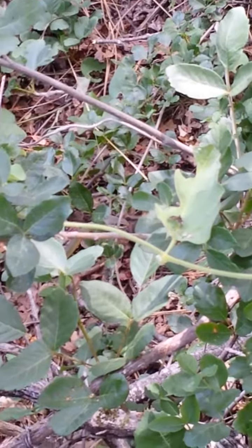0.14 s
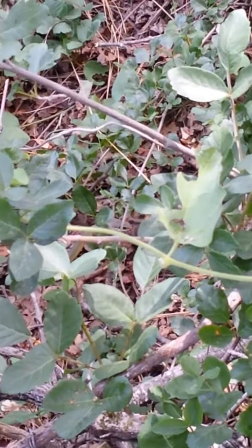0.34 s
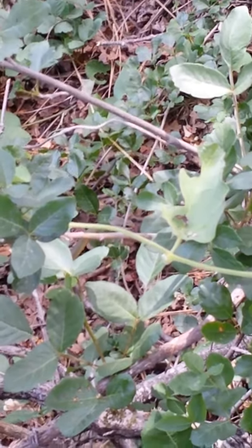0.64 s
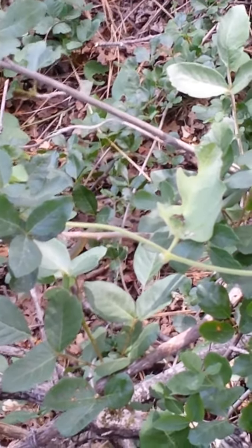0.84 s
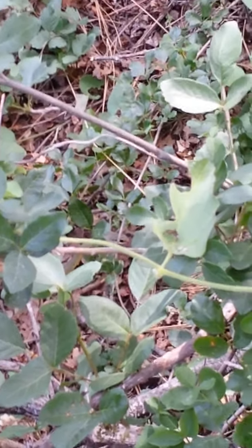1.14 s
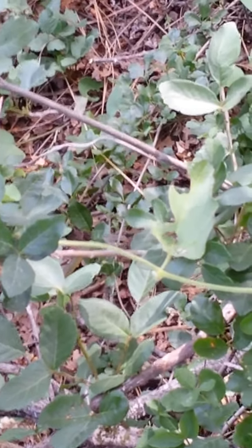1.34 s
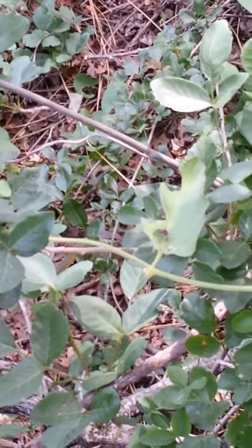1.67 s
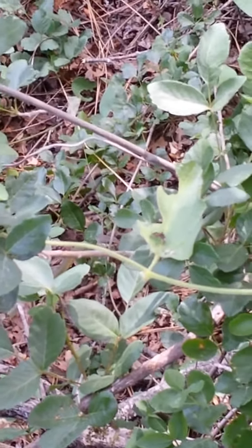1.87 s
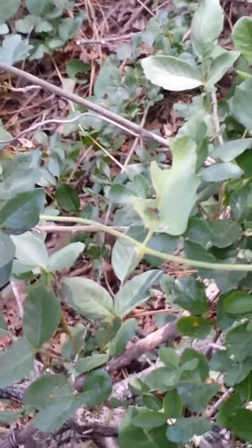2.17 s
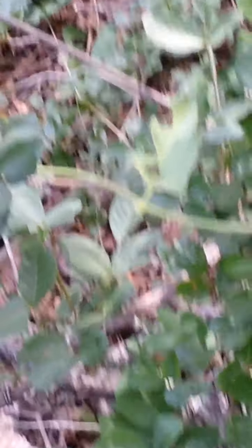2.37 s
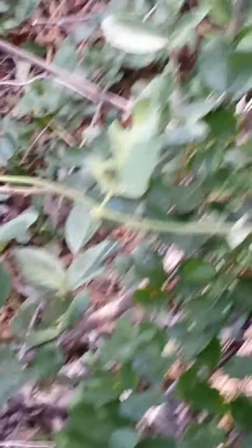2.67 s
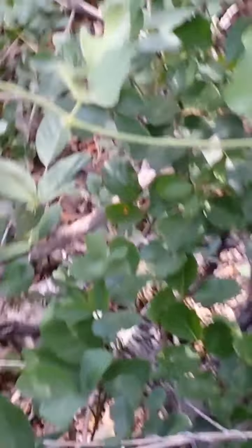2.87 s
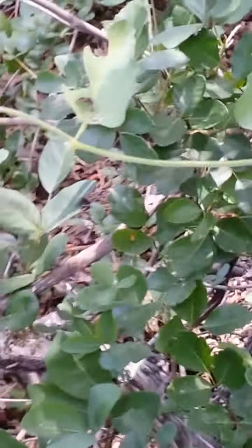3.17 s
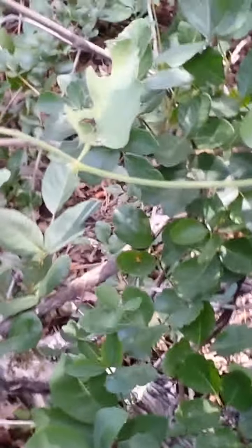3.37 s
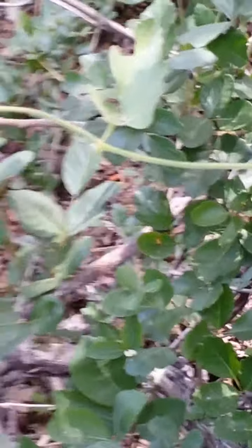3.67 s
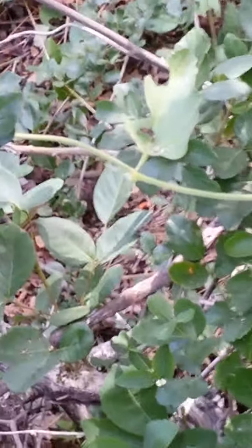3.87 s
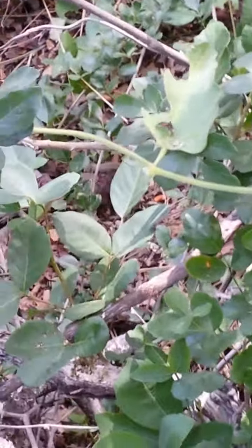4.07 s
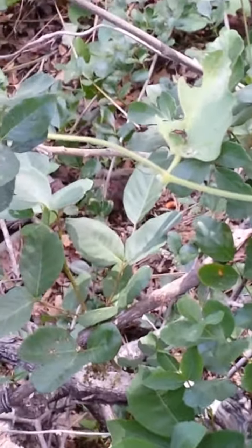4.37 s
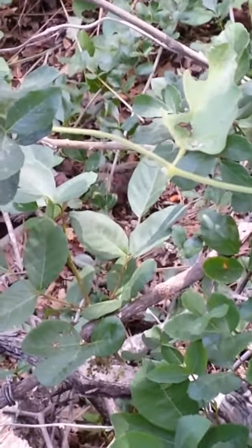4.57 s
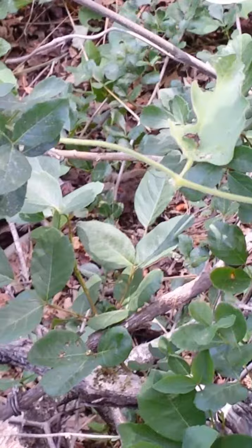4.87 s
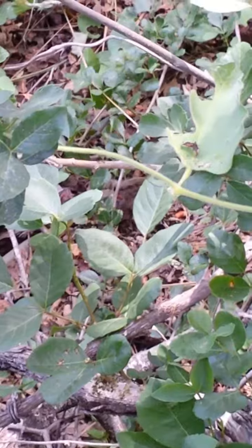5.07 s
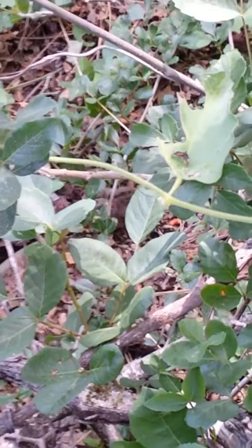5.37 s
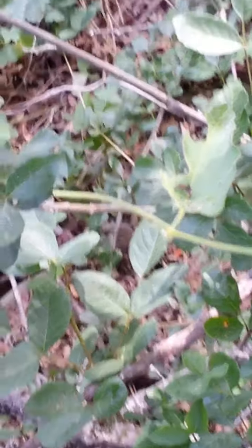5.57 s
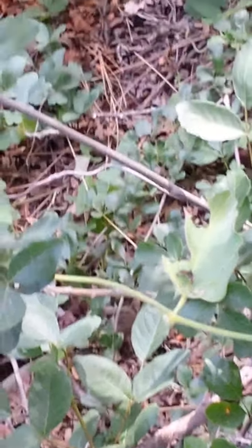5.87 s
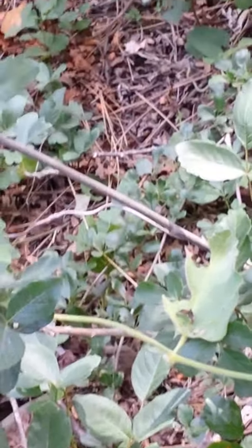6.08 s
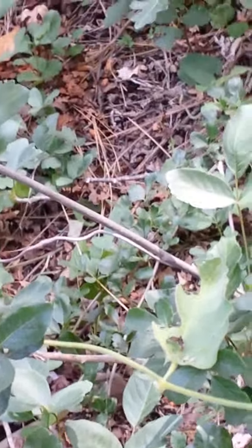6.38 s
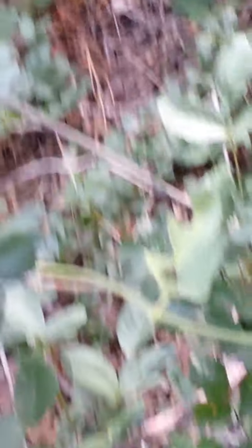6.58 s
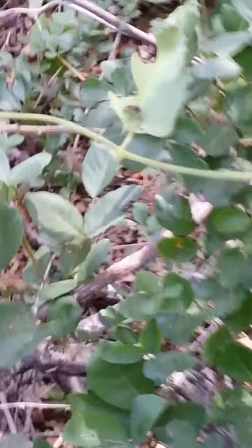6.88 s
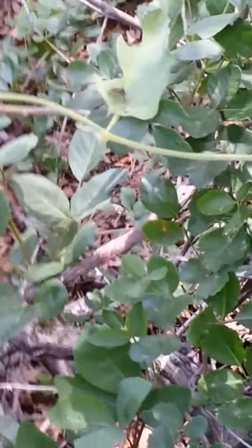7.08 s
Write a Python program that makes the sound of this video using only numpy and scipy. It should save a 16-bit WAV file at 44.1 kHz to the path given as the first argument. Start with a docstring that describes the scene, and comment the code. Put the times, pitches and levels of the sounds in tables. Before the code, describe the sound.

Small rodent squealing about four times a second in low brush, leaves crackling as it kicks, close handling bumps and soft outdoor hiss.

```python
"""Mouse squealing in low brush

A distressed mouse squeals in arching squeaks, stacks of gliding harmonics that break into rasp and hiss.
A few soft whimpers are bending pure tones, and its kicks crackle in dry leaves as bursts of tiny noise grains.
A phone is held close over it: the hand thumps (short swings), clicks (pressure steps) and rubs (noise)
on the case, and its two sound ports hear very different shares. Soft outdoor noise lies underneath.
"""
import sys
import numpy as np
from scipy import signal
from scipy.fft import rfft, irfft, next_fast_len
from scipy.io import wavfile
from scipy.ndimage import map_coordinates

SR = 44100
rng = np.random.default_rng(int(sys.argv[2]) if len(sys.argv) > 2 else 0)


def to_wav(s):
    """Save 16-bit WAV."""
    ch = np.atleast_2d(s).T  # columns
    pcm = np.round(np.clip(ch, -1, 1) * 32767)  # PCM
    wavfile.write(sys.argv[1], SR, pcm.astype(np.int16))


N = 318181
TIME = np.arange(N) / SR
FREQS = np.fft.rfftfreq(next_fast_len(N, True), 1 / SR)
TOP_HZ = 14750  # upper limit of the sound's band


# squeaks: (start [s], length [s], climb time [s], crest pitch [Hz], climb [Hz], fall [Hz per s],
#   rounding of the crest [s], voice breaks after [s], roughness [0-1], level [dB],
#   swell from start to end [dB], second harmonic [dB], third harmonic [dB],
#   mouth resonance at the start [Hz], at the end [Hz], fundamental against the whole cry [dB])
SQUEAK_RUN = [(1.159, 0.025, 0.013, 1507, 101, 5000, .02, .02, .35, -42, 14, 0, 1, 9100, 9100, -15),
              (1.339, 0.097, 0.027, 1822, 375, 7090, 0.0038, 0.063, 0.42, -40.5, 0, 4, 6.5, 8900, 9600, -12.5),
              (1.55, 0.12, .022, 1689, 305, 11070, 0.066, 0.06, 0.42, -40.5, 4, -3, 8.5, 9800, 9050, -14.5),
              (1.811, 0.14, 0.015, 1560, 152, 7240, 0.013, 0.05, 0.38, -39.5, -11, -6, 0.5, 9100, 9100, -16.5),
              (2.066, 0.15, 0.03, 1544, 335, 7900, .067, .1, 0.35, -41.5, -3.5, -7, 5, 9040, 9400, -15),
              (2.366, .075, .025, 1539, 404, 7240, 0.011, 0.04, .35, -42.5, 1.5, -4, 7, 9200, 10000, -17),
              (2.597, 0.068, 0.036, 1602, 296, 12000, 0.0057, .041, 0.48, -44.5, 1, -1, 5.5, 8600, 9400, -14),
              (2.812, .12, 0.049, 1964, 322, 5800, 0.0035, 0.092, 0.4, -39.5, 1, -1, 2, 7800, 10300, -17),
              (3.105, 0.16, 0.025, 1655, 343.6, 7650, .011, 0.1, 0.43, -43, -9, -6, 3, 10900, 8000, -15),
              (3.513, 0.053, 0.024, 1753, 213, 19300, .013, 0.053, 0.2, -37.5, 4, -4, 0.5, 10200, 9900, -21),
              (3.704, 0.067, 0.023, 1924, 389, 14000, .015, 0.042, 0.6, -45, 3.5, -3, 2, 9500, 10000, -18),
              (3.89, 0.068, 0.031, 1870, 227, 19800, 0.012, 0.058, 0.42, -43, 5, -2, -3, 9400, 9400, -20),
              (4.11, 0.12, .021, 1727, 235, 11630, 0.052, .085, 0.42, -45.5, -0.5, -1, -1, 9100, 9300, -19),
              (4.376, 0.082, 0.024, 1540, 193, 8860, 0.013, .055, 0.44, -46, 6, 3, -9, 9200, 9300, -15),
              (4.628, 0.066, 0.018, 1818, 80, 20800, 0.043, 0.036, 0.23, -38.5, -7, -3, 2.5, 9300, 9100, -21.5),
              (4.837, 0.09, 0.031, 1595, 286, 9700, 0.014, .06, 0.3, -43.5, 0, 1, 1, 9900, 9500, -14),
              (5.121, 0.06, .025, 1372, 61, 18000, .023, .035, 0.43, -45, 12, -1, -1, 8650, 9050, -18),
              (5.373, 0.06, 0.026, 1576, 220, 17400, 0.0046, 0.04, 0.38, -42.5, 1, -1, 4.5, 8900, 9400, -13.5),
              (5.614, 0.077, 0.012, 1642, 185, 13450, 0.0084, 0.05, 0.73, -45, -1, -1, 2.5, 9300, 9100, -15),
              (5.843, 0.074, 0.014, 1497, 80.6, 15000, 0.054, 0.032, 0.55, -42.5, -1, 2.5, 6, 8700, 9100, -16.5),
              (6.157, 0.056, 0.015, 1538, 290, 21480, 0.026, .036, 0.56, -45, 8, 2.5, 11, 8800, 8500, -15.5),
              (6.429, 0.051, 0.0098, 1494, 40, 20800, 0.039, 0.03, .4, -49.5, 3, 3, 1, 8750, 8600, -12.5),
              (6.658, 0.082, 0.017, 1666, 156, 7620, 0.0043, 0.058, 0.54, -42, -1.5, 1, 0, 9800, 10000, -13.5),
              (6.912, 0.088, 0.0069, 1530, 261, 8900, 0.03, 0.035, 0.3, -44, 1, 1, 3, 9000, 8800, -14),
              (7.163, 0.079, 0.026, 1620, 198, 21600, 0.02, 0.053, 0.33, -40, 4, -2, -8, 9300, 9600, -17)]
# colour of the rasping air: (frequency [Hz], level [dB])
RASP_COLOUR = [(1500, -6), (3200, -21), (4900, -2), (6500, -5.5), (8200, 5.5), (9200, 11), (10500, -5),
               (12200, 4), (14500, -5.5)]


def mouse():
    """The run of squeaks: each adds its voice and a slice of coloured air noise shaped by its hiss."""
    out = np.zeros((2, N + SR))
    air = colour(rng.standard_normal((2, N)), RASP_COLOUR)
    air = np.pad(air, ((0, 0), (0, SR)))
    for row in SQUEAK_RUN:
        voice, hiss, first = squeak(row)
        span = slice(first, first + voice.shape[1])
        out[:, span] += voice + hiss * air[:, span]
    return out[:, :N]


# throat of the mouse: (frequency [Hz], level [dB])
THROAT_OUTLINE = [(1500, 4), (2300, -6.5), (3050, -17), (3700, -16.5), (4800, -12.5), (6000, -15),
                  (7500, -12.5), (9100, -9), (10800, -9), (12200, -8.5), (14500, -22)]
# above this pitch the overtones give way to rasp
SMEAR_HZ, SMEAR_WIDTH_HZ, SMEAR_DB = 11800, 600, -6


def mouth_gains(partial_hz, mouth_hz, mouth_db=9, mouth_width_hz=950):
    """Each overtone flares as it slides through the resonance of the moving mouth."""
    resonance_db = mouth_db * np.exp(-((partial_hz - mouth_hz) / mouth_width_hz) ** 2)
    smear_db = SMEAR_DB * (.5 + .5 * np.tanh((partial_hz - SMEAR_HZ) / SMEAR_WIDTH_HZ))
    gains = undb(shape_db(THROAT_OUTLINE, partial_hz) + resonance_db) * (partial_hz < TOP_HZ)
    gains = gains * undb(smear_db)
    # scale the overtones so that together their average power over the whole cry is fixed
    return gains / np.sqrt(np.mean(np.sum(gains ** 2, axis=0)) / 2)


# share of the hand's shadow that each frequency feels: (frequency [Hz], share [0-1])
SHADOW_SHARE = [(1500, 0.33), (4500, 0.82), (8500, 0.38)]
BREAK_FADE_S = .01  # how quickly the voice breaks
HANG_S = 0.006  # the voice dies this long after the listed length
# growth of the roughness after the break and at the onset; depth of period doubling
BROKEN_RASP, ONSET_RASP, DOUBLING = 1.1, .5, .3
JITTER = .018  # fast scatter of the pitch, as a share, at roughness 1
WAVER = .004  # slower unsteadiness of the pitch, as a share
AIR_DB, AIR_RISE_S = 0, .014  # air against the voice at roughness 1, and how long it takes to build
CHEST_FADE_DB = -12  # what the three lowest harmonics have lost at the listed length
PATCHY_DB, PATCHY_PER_S = 4.5, 85  # how far and how often each overtone fades in and out


def squeak(row, flutter_db=1, attack_s=.007, release_s=0.026, climb_db=-20):
    """One squeal: the pitch climbs, rounds a crest and glides down while the voice breaks into rasp."""
    (start, length, climb_s, crest_hz, climb_hz, fall_hz_per_s, bend_s, break_s, rasp, db, swell_db,
     second_db, chest_db, mouth_start_hz, mouth_end_hz, fundamental_db) = row
    t = np.arange(-attack_s / 2, length + HANG_S, 1 / SR)
    size = len(t)
    pan_db = cover(start + length / 2)

    # the pitch arch
    rise = np.clip(1 - t / climb_s, 0, 1)
    lift = climb_hz * rise ** 2
    sag = fall_hz_per_s * (np.hypot(np.maximum(t - climb_s, 0), bend_s) - bend_s)
    hz = (crest_hz - lift - sag) * (1 + WAVER * walk(147, size))

    # the folds start unevenly, settle at the crest, and lose their rhythm at the break
    broken = .5 + .5 * np.tanh((t - break_s) / BREAK_FADE_S)
    rough = rasp * (1 + BROKEN_RASP * broken + ONSET_RASP * rise)
    # uneven cycles smear the high overtones first and leave the low ones clear
    uneven_hz = hz * (1 + JITTER * rough * walk(1400, size))
    phase = 2 * np.pi * np.cumsum(uneven_hz) / SR

    orders = np.arange(2, 15)[:, None]
    partial_hz = orders * hz
    mouth_hz = np.interp(t, [0, length], [mouth_start_hz, mouth_end_hz])
    mouth = mouth_gains(partial_hz, mouth_hz)
    # a chesty cry leans on the second and third harmonics; the low ones give out first
    spent_db = CHEST_FADE_DB * np.clip(t / length, 0, 1) ** 3
    chest = second_db * (orders == 2) + chest_db * (orders == 3) + spent_db * (orders <= 3)
    # gliding through the echoes of ground and leaves, each overtone fades in and out on its own
    patches = PATCHY_DB * np.array([np.minimum(walk(PATCHY_PER_S, size), 1) for _ in orders])
    # now and then long and short cycles alternate, which puts lines between the high overtones
    limp = DOUBLING * rough * walk(71, size) * np.sin(phase / 2) / np.pi
    partials = mouth * undb(chest + patches) * np.sin(orders * (phase + limp))
    overtones = np.sum(ports(pan_db * shape_db(SHADOW_SHARE, partial_hz)) * partials, axis=1)

    # the fundamental fades as the pitch sinks
    fundamental = undb(db + fundamental_db + spent_db) * hz / crest_hz * np.sin(phase)
    fundamental = ports(pan_db * shape_db(SHADOW_SHARE, hz)) * fundamental

    gate = np.clip((t - t[0]) / attack_s, 0, 1) * np.clip((t[-1] - t) / release_s, 0, 1)
    # the voice is still weak while the pitch climbs
    effort_db = db + climb_db * lift / crest_hz + swell_db * (t / length - .5)
    effort_db = effort_db + flutter_db * walk(123.5, size)
    effort = gate * undb(effort_db) / np.sqrt(1 + rough ** 2)
    # air builds up and hisses through the folds once a cycle
    build = np.clip((t - t[0]) / AIR_RISE_S, 0, 1)
    hiss = effort * rough * undb(AIR_DB) * build * (1 + .5 * np.cos(phase))
    hiss = ports(pan_db * shape_db(SHADOW_SHARE, mouth_hz)) * hiss
    return effort * overtones + gate * fundamental, hiss, int((start + t[0]) * SR)


# soft pure whimpers around the squeaks:
#   (start [s], length [s], start pitch [Hz], end pitch [Hz], level [dB])
SOFT_WHIMPERS = [(.335, 0.044, 1540, 1510, -70), (1.104, 0.06, 1640, 1460, -65),
                 (1.168, 0.024, 1450, 1960, -58.5), (1.415, 0.015, 1460, 1860, -57.5),
                 (2.425, 0.0196, 1400, 1800, -61), (2.639, 0.022, 1490, 1830, -58),
                 (6.205, 0.023, 1460, 1700, -69)]


def whimpers(cover_share=0.41):
    """With little effort behind it the voice is a nearly pure tone that bends ever faster."""
    out = np.zeros((2, N))
    for start, length, start_hz, end_hz, db in SOFT_WHIMPERS:
        span = slice(int(start * SR), int((start + length) * SR))
        progress = np.linspace(0, 1, len(TIME[span]))
        hz = start_hz + (end_hz - start_hz) * progress ** 2
        tone = np.sqrt(progress * (1 - progress)) * np.sin(2 * np.pi * np.cumsum(hz) / SR)
        out[:, span] += ports(cover_share * cover(start)) * undb(db) * unit(tone)
    return out


# kicks in the leaves: (middle [s], length at half power [s], level [dB])
KICKS = [(1.49, 0.13, -49), (1.656, 0.042, -41.5), (1.735, 0.29, -49), (1.89, 0.37, -50.5),
         (2.084, 0.18, -51), (3.25, 0.076, -47.5), (3.33, 0.013, -48), (3.387, 0.048, -42.5),
         (4.333, 0.011, -43), (4.393, 0.073, -44.5), (4.5, 0.054, -48), (4.774, 0.19, -55.5),
         (5.854, 0.44, -58.5), (6.895, 0.017, -45), (6.928, 0.026, -40), (7, 0.079, -48.5),
         (7.092, 0.031, -45.5)]
# colour of the dry leaves: (frequency [Hz], level [dB])
LEAF_COLOUR = [(900, 0.5), (2000, -2.5), (3500, -0.5), (5200, 1), (6800, 1.5), (9100, 6), (10500, 3),
               (12500, 1.5), (14500, -9.5)]


def scrabbling(grain_db=-0.5, flicker_db=1.1, grain_rate=7000, cover_share=0.46):
    """Dry leaves crackle in dense tiny grains (grain_rate a second) whenever the animal kicks."""
    power = sum(undb(2 * db) * np.exp(-np.log(16) * ((TIME - s) / length) ** 2)
                for s, length, db in KICKS)
    sizes = undb(grain_db * np.minimum(rng.exponential(size=(2, N)), 6))
    grains = (rng.random((2, N)) < grain_rate / SR) * sizes * rng.standard_normal((2, N))
    crackle = np.sqrt(power) * colour(grains, LEAF_COLOUR) * undb(flicker_db * walk(90))
    return ports(cover_share * cover(TIME)) * crackle


def brush(x, t60=0.11, wet_db=-12):
    """Stems, leaves and ground scatter a short diffuse tail, 60 dB down after t60 seconds."""
    t = TIME[:SR // 3]
    tail = rng.standard_normal((2, len(t))) * undb(-60 * t / t60) * (t > .002)
    tail /= np.sqrt(np.sum(tail ** 2, axis=1, keepdims=True))
    return x + undb(wet_db) * signal.fftconvolve(x, tail, axes=1)[:, :N]


# thumps of the hand on the case:
#   (middle [s], level [dB], pitch [Hz], length at half height [s], nearer port)
HAND_THUMPS = [(0.546, -23.5, 107, 0.0056, "right"), (0.653, -23.5, 118, 0.013, "right"),
               (0.684, -31.5, 106, 0.0089, "right"), (0.728, -18, 142, 0.0081, "right"),
               (0.747, -23, 105, 0.0092, "right"), (.841, -12, 116, 0.0031, "right"),
               (1.069, -33, 89.5, 0.035, "right"), (1.876, -27, 111.3, 0.054, "right"),
               (1.889, -11, 111, 0.0082, "right"), (2.375, -19, 121, 0.008, "right"),
               (2.388, -25.5, 103.7, 0.038, "left"), (2.564, -23.5, 71, 0.046, "left"),
               (2.675, -22, 133, 0.005, "left"), (3.25, -26, 165, 0.011, "left"),
               (4.541, -27, 70, 0.015, "left"), (4.592, -33, 90, .008, "right"),
               (4.641, -30, 102, 0.0088, "right"), (4.815, -25.5, 103, 0.013, "left"),
               (4.916, -23, 163, 0.0081, "left"), (4.93, -24, 92.5, 0.014, "left"),
               (5.132, -26, 108, 0.018, "left"), (5.389, -27, 98, 0.017, "right"),
               (5.423, -15, 154, 0.0051, "left"), (5.432, -17, 86.4, 0.022, "left"),
               (5.625, -13, 76.4, 0.0081, "right"), (5.708, -27, 151, 0.011, "right"),
               (5.943, -19, 112, 0.0044, "left"), (6.793, -28, 74.6, 0.021, "left"),
               (6.932, -34, 75, 0.012, "left"), (7.04, -27, 83, 0.012, "left")]


def thumps(leak_hz=45):
    """Each shove of the hand swings the case briefly; steady pressure leaks away below leak_hz."""
    out = np.zeros((2, N))
    for s, db, hz, length, port in HAND_THUMPS:
        span = slice(int((s - .08) * SR), int((s + .08) * SR))
        t = TIME[span] - s
        swing = np.cos(2 * np.pi * hz * t) / np.cosh(2 * np.arccosh(2) * t / length)
        out[:, span] += touch(port) * undb(db) * swing
    return filtered(out, FREQS ** 2 / (FREQS ** 2 + leak_hz ** 2))


# sharp clicks of a finger, before filters and port gains: (time [s], level [dB], release [s])
FINGER_CLICKS = [(2.5888, -11, 0.00089), (2.5932, -19, 0.0042), (2.605, -15, 0.0037),
                 (2.6094, -16.5, 0.00029), (2.63, -33.5, 0.00062), (2.6691, -25, 0.0041),
                 (4.913, -23, 0.0038), (5.4182, -28, 0.0029)]


def clicks(low_hz=110, soft_hz=2600, rise_share=0.12, crack_db=-14, left_db=6, right_db=-35):
    """A finger slips at the left port: pressure steps leak away and overshoot, with a thin crack on top."""
    push, t = np.zeros(N), TIME[:SR // 50]
    for s, db, release in FINGER_CLICKS:
        first = int(s * SR)
        # a softer touch both builds and lets go more slowly
        step = np.exp(-t / release) - np.exp(-t / (rise_share * release))
        push[first:first + len(t)] -= undb(db) * step
    push = signal.sosfilt(signal.butter(2, low_hz, "high", fs=SR, output="sos"), push)
    crack = signal.sosfilt(signal.butter(2, soft_hz, "high", fs=SR, output="sos"), push)
    crack = undb(crack_db) * crack
    push = signal.sosfilt(signal.butter(2, soft_hz, fs=SR, output="sos"), push)
    return undb([[left_db], [right_db]]) * (push - crack)


# how hard the grip rocks the case at each port, before trims:
#   (time [s], left level [dB], right level [dB])
GRIP_LEVELS = [(0, -45, -48.5), (.35, -47, -48.5), (.7, -39, -35), (.95, -45.5, -46), (1.15, -40, -46.5),
               (1.95, -48, -42.5), (2.35, -36.5, -51), (2.55, -40.5, -60), (3.2, -43.5, -66),
               (3.42, -46.5, -60), (3.53, -46.5, -73), (3.6, -63, -78), (3.8, -62, -77), (4.28, -51, -78),
               (4.55, -45, -45), (4.9, -36, -49.5), (5.2, -43.5, -49), (5.45, -41.5, -42.5),
               (5.8, -45.5, -53.5), (6.42, -68, -64), (6.6, -43.5, -74), (7.21, -43, -62)]
# skin sliding along the case: (start [s], end [s], level [dB], nearer port)
SKIN_SLIDES = [(0.663, 0.783, -38.5, "right"), (1.83, 1.941, -37.5, "right"), (2.486, 3.294, -48.5, "left"),
               (5.387, 5.459, -36, "left"), (5.574, 5.786, -46.5, "right")]
# colour of the rocking case: (frequency [Hz], level [dB])
RUMBLE_COLOUR = [(20, -15.5), (40, 0.5), (65, 2.5), (95, 1), (140, -9), (220, -24), (500, -46)]
# colour of the rubbing skin: (frequency [Hz], level [dB])
RUB_COLOUR = [(100, -5), (150, 3.5), (230, -5), (330, -11), (500, -21.5), (1000, -59)]


def grip(rumble_db=-2, rub_db=-18, flicker_db=4.5, rub_flicker_db=4, slide_fade_s=0.047):
    """The hand rocks the case and its skin rubs, with separate noise at each port; a slide rubs harder."""
    s, *levels = np.transpose(GRIP_LEVELS)
    rocking = undb([np.interp(TIME, s, db) for db in levels])
    sliding = 0
    for start, end, db, port in SKIN_SLIDES:
        fade = np.clip(np.minimum(TIME - start, end - TIME) / slide_fade_s, 0, 1)
        sliding = sliding + touch(port) * undb(db) * fade
    rumble = colour(rng.standard_normal((2, N)), RUMBLE_COLOUR) * rocking
    rumble = rumble * undb(rumble_db + flicker_db * walk(25))
    rub = colour(rng.standard_normal((2, N)), RUB_COLOUR) * (rocking * undb(rub_db) + sliding)
    return rumble + rub * undb(rub_flicker_db * walk(60))


# open air, before trims: (time [s], low wash level [dB], high hiss level [dB])
AIR_LEVELS = [(0, -60.5, -56.5), (1, -56.5, -54.5), (3.1, -54, -54), (3.9, -58.5, -59), (4.5, -55, -51.5),
              (5.75, -54.5, -56), (6.38, -58, -58), (6.8, -55.5, -55), (7.21, -57, -52.5)]
# colour of the low wash: (frequency [Hz], level [dB])
WASH_COLOUR = [(40, -59), (100, -2.5), (250, -1.5), (500, -1), (800, -5.5), (1300, -15), (2200, -26),
               (4000, -35)]
# colour of the high hiss: (frequency [Hz], level [dB])
HISS_COLOUR = [(1000, 5.5), (2000, 1.5), (3800, 2), (5200, 7.5), (6500, 3), (8500, 3), (10500, 5),
               (12500, 0.5), (14500, -9)]
# balance of the hiss with both ports open: (frequency [Hz], left minus right [dB])
HISS_BALANCE = [(2000, 2.5), (4400, -4), (9000, -6.5), (14500, -0.5)]
WASH_WANDER_DB = 1.2  # slow unevenness of the low wash


def open_air(wash_db=-1, hiss_db=-1, wash_cover_share=0.18, hiss_cover_share=0.21):
    """A low outdoor wash and a smooth high hiss, both noise and both weaker at the covered port."""
    s, low_db, high_db = np.transpose(AIR_LEVELS)
    wash = colour(rng.standard_normal((2, N)), WASH_COLOUR)
    wash = wash * undb(np.interp(TIME, s, low_db) + wash_db + WASH_WANDER_DB * walk(12))
    hiss = colour(rng.standard_normal((2, N)), HISS_COLOUR)
    hiss = filtered(hiss, ports(shape_db(HISS_BALANCE, FREQS)))
    hiss = hiss * undb(np.interp(TIME, s, high_db) + hiss_db)
    return wash * ports(wash_cover_share * cover(TIME)) + hiss * ports(hiss_cover_share * cover(TIME))


# colour of the left port against the right: (frequency [Hz], level [dB])
LEFT_PORT_COLOUR = [(2000, 5.5), (5000, 5.5), (9000, -11.5), (12000, -7), (14000, 7)]


def left_port(x):
    """The left port lacks the treble resonance of the right one."""
    return np.array([filtered(x[0], undb(shape_db(LEFT_PORT_COLOUR, FREQS))), x[1]])


# the hand covers the left port more or less: (time [s], left minus right [dB])
HAND_COVER = [(0, -31), (1.17, -42), (2.1, -41), (2.42, -43), (2.62, -11), (2.86, -21.5), (3.2, -24),
              (3.55, -28), (3.73, -2.5), (3.92, -12.5), (4.15, -26), (4.65, -34), (5.42, -35), (5.64, -6),
              (5.88, 7), (6.18, 5), (6.46, 2.5), (6.67, -47), (7.21, -52)]


def cover(t):
    """Left minus right dB that the hand causes at time t; each sound feels a share of it."""
    return np.interp(t, *np.transpose(HAND_COVER))


CASE_LEAK_DB = -29  # what the far port gets of a touch


def touch(port):
    """Left and right gains of a touch next to one port."""
    return ports(-CASE_LEAK_DB if port == "left" else CASE_LEAK_DB)


def ports(pan_db):
    """Left and right gains for a left minus right dB; the louder port gets the full level."""
    pan_db = np.atleast_1d(pan_db)
    return undb(np.minimum([pan_db, -pan_db], 0))


def undb(db):
    """Decibels to gain."""
    return 10 ** (np.asarray(db) / 20)


def shape_db(points, hz):
    """Value of an outline at any frequency, in straight lines over log frequency."""
    f, db = np.transpose(points)
    return np.interp(np.log(np.maximum(hz, 1)), np.log(f), db)


def unit(x):
    """Scale to rms 1."""
    return x / np.sqrt(np.mean(x ** 2))


def filtered(x, gain):
    """Weight each frequency of a sound."""
    size = next_fast_len(N, True)
    return irfft(rfft(x, size) * gain, size)[..., :N]


def colour(x, points):
    """Give a sound an outline that falls away below its first point; rms 1."""
    skirt = np.minimum(FREQS / points[0][0], 1) ** 2
    return unit(filtered(x, undb(shape_db(points, FREQS)) * skirt))


def walk(rate, size=N):
    """Random wander of spread about 1: straight lines between chance values, rate of them a second."""
    knots = rng.standard_normal(4096)
    wander = map_coordinates(knots, [np.arange(size) * rate / SR], order=1, mode="wrap")
    return wander / np.sqrt(2 / 3)  # straight lines between the values lower the spread


def scene():
    """The mouse in the brush, the hand on the phone, the air around."""
    animal = left_port(brush(mouse() + whimpers() + scrabbling()))
    hand = thumps() + clicks() + grip()
    return animal + hand + open_air()


def record(dry):
    """A steep low-pass at TOP_HZ ends the band."""
    return signal.sosfilt(signal.ellip(10, .2, 80, TOP_HZ, fs=SR, output="sos"), dry)


dry = scene()
out = record(dry)
to_wav(out)
```